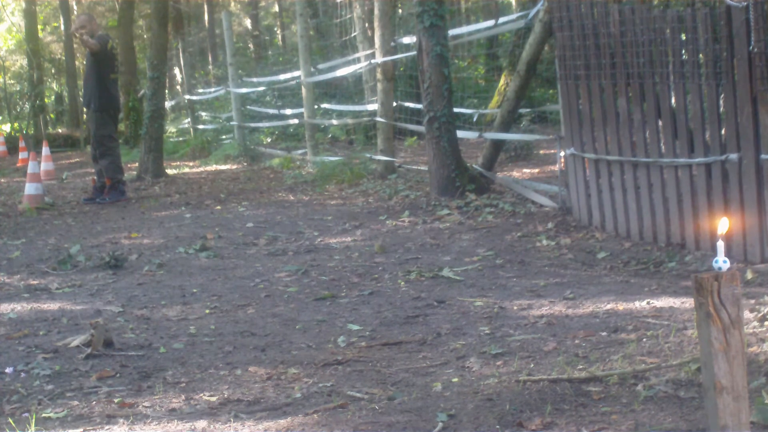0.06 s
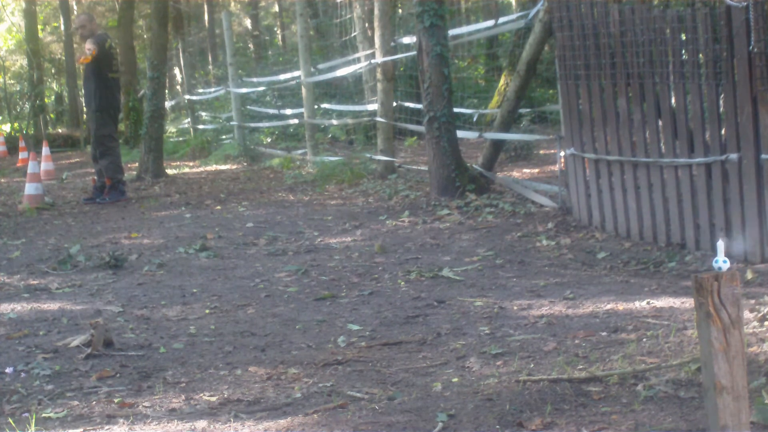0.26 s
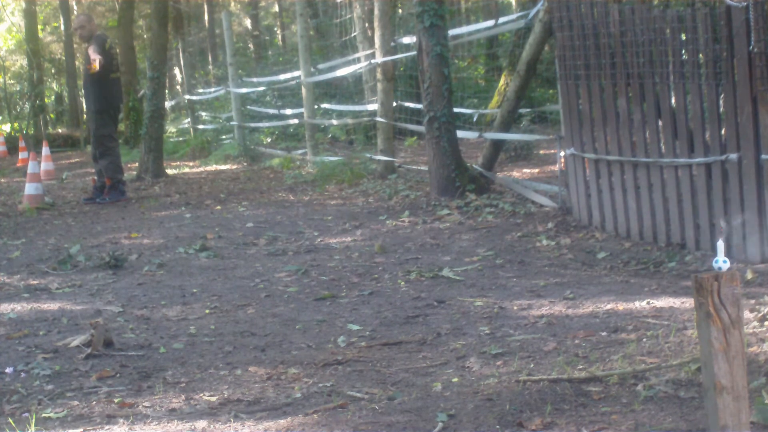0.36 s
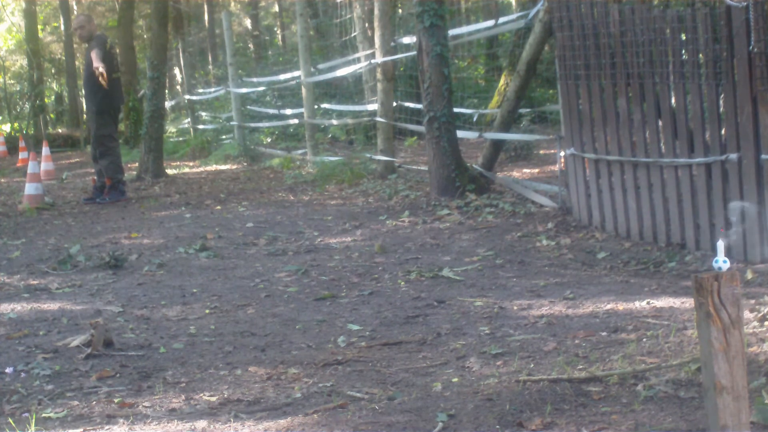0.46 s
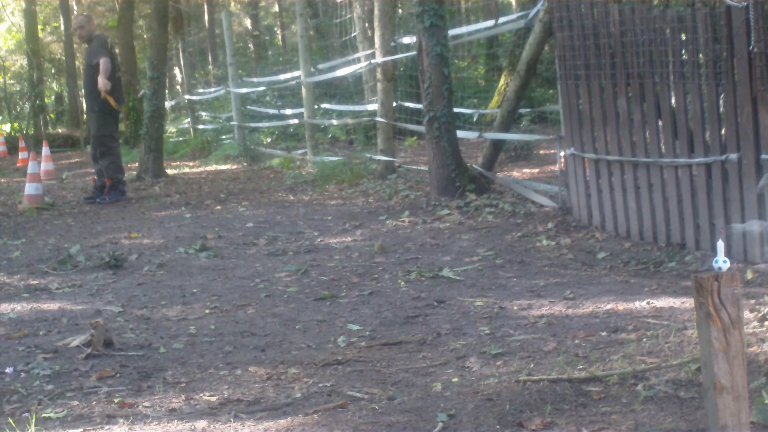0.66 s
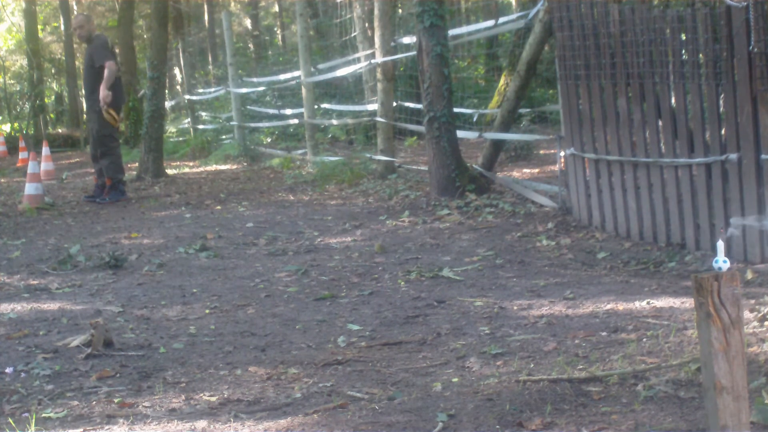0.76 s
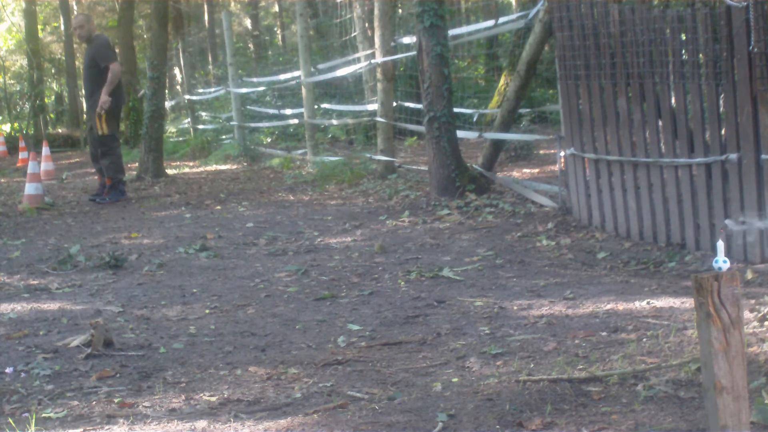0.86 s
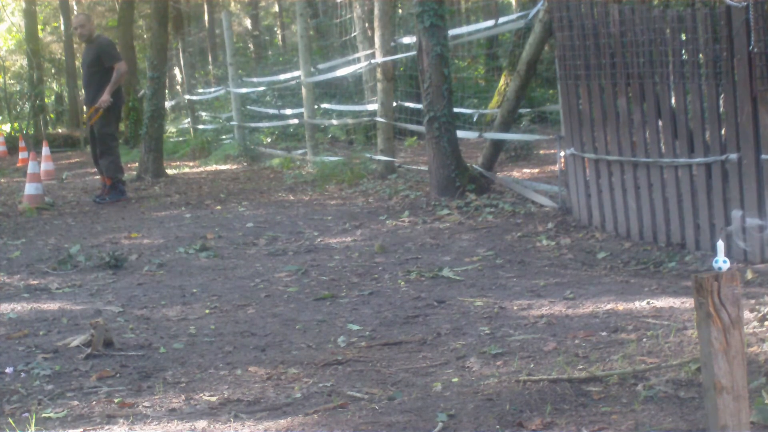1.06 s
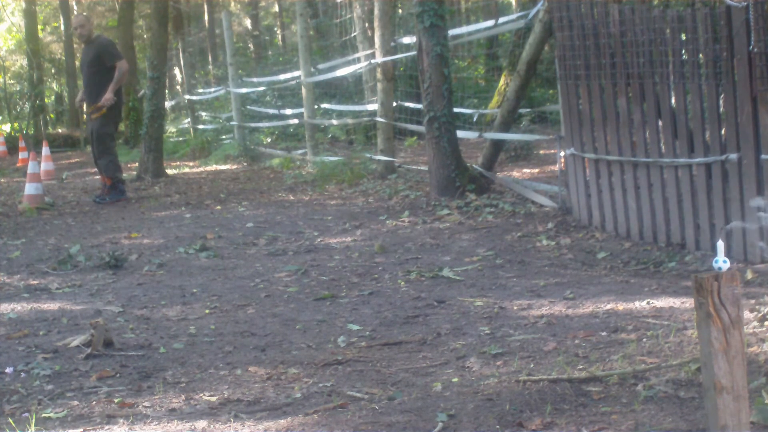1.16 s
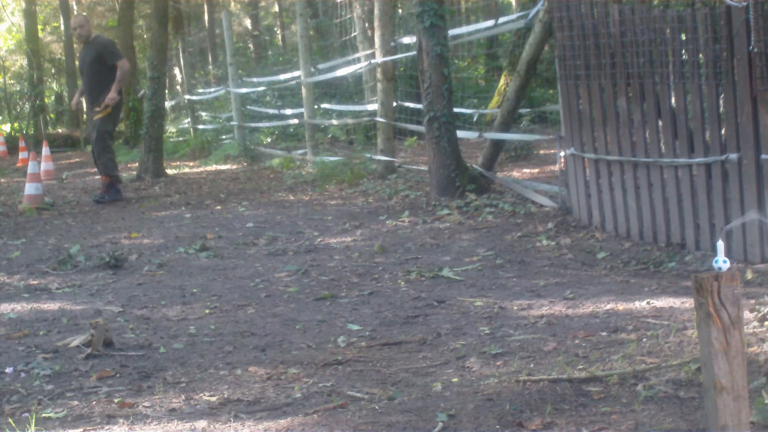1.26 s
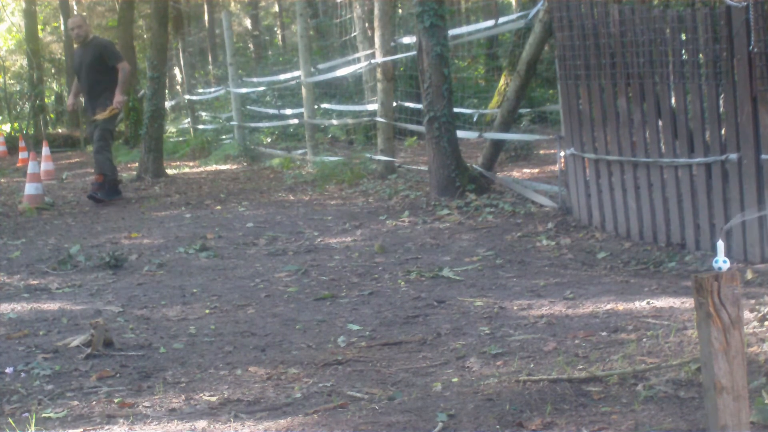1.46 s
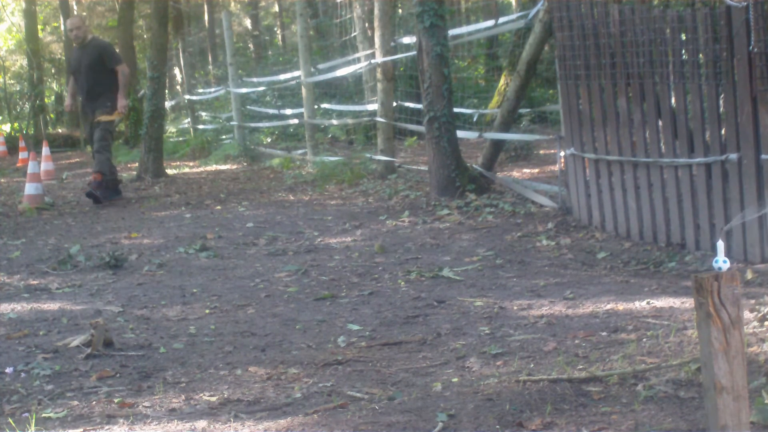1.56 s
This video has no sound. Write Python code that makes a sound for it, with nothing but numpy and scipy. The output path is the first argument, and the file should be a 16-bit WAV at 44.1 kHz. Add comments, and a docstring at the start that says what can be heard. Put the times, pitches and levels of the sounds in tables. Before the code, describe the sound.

In a quiet forest clearing, an air gun hisses and cracks very close to the microphone, its thump distorted; the tail scatters among trunks, followed by small metallic clicks, soft footsteps on litter and faint treble hiss.

```python
"""Air gun shot in a wooded clearing

Air hisses out in spurts of shaped noise, then come a sharp N-shaped snap and a noisy crack, led by a step of
pressure; its low thump overloads the microphone. Trunks scatter the shot into a short bright tail of decaying noise.
Afterwards the gun clicks as it is handled (ticks and damped modes), dry litter crackles underfoot (noise bursts),
a grainy treble hiss of random ticks fades in, and a distant bird gives one rising whistle (a gliding sine)
over quiet forest air.
"""
import sys
import numpy as np
from scipy import signal
from scipy.fft import rfft, irfft
from scipy.io import wavfile
from scipy.ndimage import uniform_filter1d

SR = 44100
rng = np.random.default_rng(int(sys.argv[2]) if len(sys.argv) > 2 else 0)


def unload_audio(sound):
    """Save the sound as a 16-bit wav file, at the path given as the first command line argument."""
    columns = np.transpose(np.atleast_2d(sound))
    # keep every value between -1 and 1, then stretch to whole-number steps
    steps = np.round(np.clip(columns, -1, 1) * 32767)
    wavfile.write(sys.argv[1], SR, steps.astype(np.int16))


N = 70560
T = np.arange(N) / SR  # time axis, s

# Every "colour" below is a noise or pulse spectrum; only its shape counts, its level is set apart.

# Colour of the quiet forest air: freq_hz, density_db (dB per Hz)
AIR_COLOUR = [(25, -14.5), (60, -4.5), (140, 0.5), (250, -2.5), (400, -8), (1000, -12), (2500, -18.5),
              (4500, -18.5), (8000, -17), (10000, -23), (15000, -25.5)]
AIR_DB = -64

# Spurts of escaping air: start_s, level_db, decay_s, throat_db (dB relative to the spurt)
AIR_SPURTS = [(0.1216, -33.5, .011, 4), (0.1548, -24, 0.0033, -14.5), (.169, -29.5, 0.0056, -21)]
# Colour of the air jet: freq_hz, density_db (dB per Hz)
JET_COLOUR = [(100, -15.5), (500, -12.5), (1100, -13), (1650, -1.5), (2200, -14), (3400, 2), (4400, -8),
              (5750, 3.5), (6500, -2.5), (7200, 0.5), (8300, -4), (10000, -5), (12000, -14), (15000, -10.5)]
# Colour of the throaty part of the jet: freq_hz, density_db (dB per Hz)
THROAT_COLOUR = [(60, -9), (150, 5), (400, -2.5), (750, -10), (1150, 4.5), (1380, -6.5), (1700, 5),
                 (2100, -11), (2700, -1), (5000, -24.5), (10000, -10.5), (15000, -30)]
JET_START_S, JET_END_S, JET_RISE_S, JET_RELEASE_S = 0.113, 0.245, 0.016, 0.012
JET_DB, JET_FLUTTER_DB = -37, 1

# Colour of the scatter from the ground, for snap and crack: freq_hz, density_db (dB per Hz)
GROUND_COLOUR = [(100, -12.5), (700, -5), (2000, 1), (4000, -7), (8000, -9), (15000, -23)]
SNAP_S, SNAP_HZ, SNAP_DB = 0.2198, 2300, -6.5
SNAP_SCATTER_DB, SNAP_SCATTER_S = -21.5, 0.0084

# Colour of the turbulent crack: freq_hz, density_db (dB per Hz)
CRACK_COLOUR = [(100, -16.5), (700, -11.5), (1400, -12.5), (1800, -1.5), (2700, 2.5), (4400, -7.5),
                (5600, -2), (6600, -10.5), (10000, -10.5), (14500, -7.5)]
# Damped modes struck by the crack: freq_hz, level_db, t60_s
CRACK_MODES = [(1870, -0.5, .004), (2700, 8, .0022), (5550, -1.5, .0045)]
CRACK_S, CRACK_HOLD_S, CRACK_DECAY_S, CRACK_DB = 0.2442, 0.0016, 0.0005, -2.5
FRONT_DB, FRONT_DECAY_S = -2.5, 0.0009  # the step of pressure that leads the crack
SPLASH_DB, SPLASH_DECAY_S = -19.5, 0.01  # scatter from the ground nearby

# Colour of the thump's pressure pulse: freq_hz, density_db (dB per Hz)
THUMP_COLOUR = [(30, -25), (65, -11.5), (100, -1.5), (165, 4.5), (230, -2.5), (350, -8), (400, -10),
                (480, -4), (760, -2.5), (1150, -6.5), (1400, -25.5), (3000, -43.5), (8000, -61)]
# Damped modes of the thump: freq_hz, level_db, t60_s
THUMP_MODES = [(113, -17.5, .04), (269.4, -13.5, 0.065), (345, -22.5, 0.079), (520, -4.5, 0.0063),
               (900, -7, 0.0027)]
THUMP_S, THUMP_DB = 0.2459, 5.5

# Colour of the echo from the trunks: freq_hz, density_db (dB per Hz)
WOOD_COLOUR = [(50, -5.5), (150, 8), (320, 13), (500, -1.5), (1200, -5), (2200, -5.5), (3400, -1),
               (4400, -8), (5200, -6), (5750, 2), (6500, -8), (10000, -12), (14000, -16.5)]
# Decay of that echo: freq_hz, t60_s
WOOD_DECAY = [(100, .5), (300, .48), (1000, 0.84), (3000, 1), (6000, 0.53), (14000, .5)]
WOOD_DB, WOOD_ONSET_S = -23.5, 0.0061
CRACK_TO_WOOD_DB, KNOCK_TO_WOOD_DB = 17, 3  # how strongly crack and knocks reach the trunks

# Knocks of the handled gun: start_s, level_db, body_db (dB relative to the tick), decay_s
GUN_KNOCKS = [(0.6867, -35, -17, 0.0011), (.6895, -30, -4.5, 0.0019), (0.7, -46.5, -5.5, 0.0037)]
# Colour of the hard tick: freq_hz, density_db (dB per Hz)
TICK_COLOUR = [(300, -34), (1300, -16), (1850, -1), (2600, 3), (3200, -10), (6000, -9), (8000, -7),
               (10000, -14), (13000, -28)]
# Colour of the low hollow body: freq_hz, density_db (dB per Hz)
BODY_COLOUR = [(60, -12), (150, -1.5), (380, -15), (520, -0.5), (750, -1.5), (1050, -9), (2000, -53),
               (8000, -26)]
# Damped modes of each knock: freq_hz, level_db (dB relative to the knock), t60_s
KNOCK_MODES = [(1850, -12, .016), (2570, -6, .02)]

# Crackles of twigs and leaves: start_s, level_db, decay_s
LITTER_CRACKLES = [(0.785, -57, 0.033), (0.869, -56.5, 0.0051), (0.9237, -50, 0.0085), (0.951, -48, 0.0025),
                   (1.0459, -54.5, 0.0055), (1.075, -56, 0.0066), (1.122, -51, 0.0015),
                   (1.2085, -44.5, 0.0084), (1.356, -48.5, 0.003), (1.507, -46, .002), (1.538, -54, .016)]
# Colour shared by the crackles and the treble grain: freq_hz, density_db (dB per Hz)
CRISP_COLOUR = [(150, 9.5), (700, -3.5), (1500, -4), (2600, 5), (4200, -3), (6000, 3), (9000, 0.5),
                (14000, -3)]
TREBLE_GRAIN_START_S, TREBLE_GRAIN_PER_S = 0.897, 290
TREBLE_GRAIN_DB, TREBLE_GRAIN_SPREAD_DB = -67.5, 12
# Colour of the dull shuffle: freq_hz, density_db (dB per Hz)
SHUFFLE_COLOUR = [(30, -4), (90, -1), (200, -4.5), (500, -23), (1500, -25.5), (6000, -23.5)]
SHUFFLE_START_S, SHUFFLE_RISE_S, SHUFFLE_DB = 1.04, 0.45, -61.5

# Colour of the footfall on soil: freq_hz, density_db (dB per Hz)
STEP_COLOUR = [(60, 3), (200, -9), (350, 7), (550, -1.5), (1200, -19), (3000, -10), (8000, -14.5)]
STEP_S, STEP_DB, STEP_DECAY_S = 1.2115, -47, 0.0095
# Crisp scuffs of dry leaves: start_s, level_db, decay_s
LEAF_SCUFFS = [(1.545, -49, 0.01), (1.5636, -37.5, 0.0011)]
# Colour of the scuffs: freq_hz, density_db (dB per Hz)
SCUFF_COLOUR = [(500, -23), (3000, -12.5), (6000, -5.5), (8500, 8), (14000, -2.5)]

BIRD_S, BIRD_RISE_S, BIRD_HOLD_S = 1.40, 0.078, 0.032
BIRD_FROM_HZ, BIRD_TO_HZ = 3300, 4950
BIRD_DB, BIRD_ECHO_DB = -62.5, 2  # echo relative to the call

RUMBLE_CUT_HZ, TOP_HZ = 50, 15200
NOTCH_HZ, NOTCH_WIDTH_HZ = 11320, 830
AGC_TOP_DB, AGC_SLOPE = -23, 0.3  # dB of ducking per dB above the top
AGC_ATTACK_S, AGC_RELEASE_S = 0.15, 0.36


def undb(db):
    """Decibels to gain."""
    return 10 ** (np.asarray(db) / 20)


def unit(x):
    """Scale to an rms of 1."""
    return x / np.sqrt(np.mean(x ** 2))


def read(points, hz):
    """Read (Hz, value) points on a log-frequency axis."""
    p = np.array(points, float)
    return np.interp(np.log(np.maximum(hz, 1)), np.log(p[:, 0]), p[:, 1])


def noise(colour):
    """Noise of the given colour, rms 1."""
    gain = undb(read(colour, np.fft.rfftfreq(N, 1 / SR)))
    return unit(irfft(rfft(rng.standard_normal(N)) * gain, N))


def drift(rate):
    """Smoothed random steps, rate of them per second, rms near 1."""
    k = int(SR / rate)
    steps = np.repeat(rng.standard_normal(N // k + 1), k)
    return unit(uniform_filter1d(steps, k)[:N])


def fade_in(start, rise):
    """Straight rise from 0 to 1."""
    return np.clip((T - start) / rise, 0, 1)


def burst(start, decay, hold=0, rise=.0001):
    """Envelope: rise, hold (counted from the start), exponential fall."""
    return fade_in(start, rise) * np.exp(-np.maximum(T - start - hold, 0) / decay)


def ring(start, modes):
    """Damped sine modes struck at one moment."""
    age = np.maximum(T - start, 0)
    return sum(undb(db) * np.sin(2 * np.pi * hz * age) * np.exp(-np.log(1000) * age / t60)
               for hz, db, t60 in modes)


def impulse(colour):
    """A single causal (minimum-phase) pressure pulse of the given colour, peak 1."""
    cepstrum = irfft(np.log(undb(read(colour, np.fft.rfftfreq(N, 1 / SR)))), N)
    # folding the cepstrum onto positive time makes the pulse causal
    cepstrum[1:N // 2] *= 2
    cepstrum[N // 2 + 1:] = 0
    pulse = irfft(np.exp(rfft(cepstrum)), N)
    return pulse / np.abs(pulse).max()


def forest_air():
    """Quiet coloured noise whose level drifts slightly."""
    return undb(AIR_DB + .7 * drift(12)) * noise(AIR_COLOUR)


def jet():
    """Air escapes in a fluttering turbulent hiss with spurts; the first spurt is throaty."""
    hiss = undb(JET_DB) * burst(JET_START_S, JET_RELEASE_S, JET_END_S - JET_START_S, JET_RISE_S)
    throat = 0
    for start, db, decay, throat_db in AIR_SPURTS:
        spurt = undb(db) * burst(start, decay, rise=.001)
        hiss = hiss + spurt
        throat = throat + spurt * undb(throat_db)
    return (hiss * noise(JET_COLOUR) + throat * noise(THROAT_COLOUR)) * undb(JET_FLUTTER_DB * drift(400))


def trunks(x):
    """Echo from many trunks: diffuse noise with its own decay in every octave, convolved with x."""
    spectrum, hz = rfft(noise(WOOD_COLOUR)), np.fft.rfftfreq(N, 1 / SR)
    centres = 2. ** np.arange(6, 15)  # octaves from 64 to 16384 Hz
    echo = 0
    for centre, pick in zip(centres, np.eye(len(centres))):
        # overlapping triangular bands that add up to the whole spectrum
        band = irfft(spectrum * read(np.c_[centres, pick], hz), N)
        echo = echo + band * np.exp(-np.log(1000) * T / read(WOOD_DECAY, centre))
    echo = echo * np.minimum(T / WOOD_ONSET_S, 1)
    return signal.fftconvolve(x, echo / np.sqrt(np.sum(echo ** 2)))[:N]


def snap():
    """One N-shaped pressure wave and its noisy scatter from the ground."""
    u = 2 * np.pi * SNAP_HZ * (T - SNAP_S)
    wave = -u * np.exp((1 - u ** 2) / 2)
    scatter = burst(SNAP_S, SNAP_SCATTER_S) * noise(GROUND_COLOUR)
    return undb(SNAP_DB) * wave + undb(SNAP_SCATTER_DB) * scatter


def blast():
    """A pressure step that rings for an instant, a turbulent crack, then a low thump that dies quickly."""
    front = undb(FRONT_DB) * burst(CRACK_S, FRONT_DECAY_S) + ring(CRACK_S, CRACK_MODES)
    crack = undb(CRACK_DB) * burst(CRACK_S, CRACK_DECAY_S, CRACK_HOLD_S) * noise(CRACK_COLOUR)
    splash = undb(SPLASH_DB) * burst(CRACK_S, SPLASH_DECAY_S) * noise(GROUND_COLOUR)
    pulse = np.interp(T - THUMP_S, T, impulse(THUMP_COLOUR), left=0)  # moved to the thump's moment
    thump = undb(THUMP_DB) * pulse + ring(THUMP_S, THUMP_MODES)
    return front + crack + splash - thump  # the thump is added upside down


def handling():
    """Dry knocks of the gun: a hard tick and a short ring over a hollow body."""
    tick, body = noise(TICK_COLOUR), noise(BODY_COLOUR)
    knocks = 0
    for start, db, body_db, decay in GUN_KNOCKS:
        strike = burst(start, decay) * (tick + undb(body_db) * body)
        knocks = knocks + undb(db) * (strike + ring(start, KNOCK_MODES))
    return knocks


def litter():
    """Envelope of twigs and leaves that crackle underfoot: sudden bursts of uneven level."""
    crackles = sum(undb(db) * burst(start, decay) for start, db, decay in LITTER_CRACKLES)
    return crackles * undb(2.0 * drift(700))


def treble_grain():
    """Envelope of a dense, grainy treble hiss that fades in: random ticks of uneven level."""
    tick_gain = undb(TREBLE_GRAIN_SPREAD_DB * np.minimum(rng.exponential(size=N), 2))
    ticks = (rng.random(N) < TREBLE_GRAIN_PER_S / SR) * tick_gain
    grain = undb(TREBLE_GRAIN_DB) * unit(signal.fftconvolve(ticks, burst(0, 0.00083))[:N])
    return grain * fade_in(TREBLE_GRAIN_START_S, 0.045)


def shuffle():
    """A dull shuffle: low noise that swells slowly."""
    return undb(SHUFFLE_DB) * fade_in(SHUFFLE_START_S, SHUFFLE_RISE_S) * noise(SHUFFLE_COLOUR)


def feet():
    """A soft footfall, then a shoe scuffs dry leaves: short bursts of coloured noise."""
    step = undb(STEP_DB) * burst(STEP_S, STEP_DECAY_S) * noise(STEP_COLOUR)
    scuffs = sum(undb(db) * burst(start, decay) for start, db, decay in LEAF_SCUFFS)
    return step + scuffs * noise(SCUFF_COLOUR)


def bird():
    """A distant whistle, a slightly wavering sine, slides up, holds, and lingers between the trees."""
    rise = fade_in(BIRD_S, BIRD_RISE_S)
    glide_hz = BIRD_FROM_HZ + (BIRD_TO_HZ - BIRD_FROM_HZ) * rise ** 1.2
    pitch_hz = glide_hz * (1 + 0.011 * drift(500))
    tone = np.sqrt(2) * np.sin(2 * np.pi * np.cumsum(pitch_hz) / SR)  # rms 1
    call = undb(BIRD_DB) * tone * burst(BIRD_S, 0.017, BIRD_RISE_S + BIRD_HOLD_S, 0.022)
    return call + undb(BIRD_ECHO_DB) * trunks(call)


def scene():
    """The shot and its echo, the small sounds after it, and the forest air."""
    gun, knocks = jet() + snap(), handling()
    # among the trees the crack is one clean pulse
    far_crack = undb(CRACK_TO_WOOD_DB) * (np.arange(N) == int(CRACK_S * SR))
    echo = undb(WOOD_DB) * trunks(gun + far_crack + undb(KNOCK_TO_WOOD_DB) * knocks)
    shot = gun + blast() + knocks + echo
    # crackles and treble grain shape one and the same noise
    crisp_level = litter() + treble_grain()
    dull = shuffle()
    crisp = crisp_level * noise(CRISP_COLOUR)
    return (shot + (crisp + dull) + feet() + bird() + forest_air())[None]


def record(dry):
    """The microphone cuts rumble, overloads and has a treble notch; gain control ducks, then recovers slowly."""
    rumble_cut = signal.butter(2, RUMBLE_CUT_HZ, "high", fs=SR, output="sos")
    x = np.tanh(signal.sosfilt(rumble_cut, dry[0]))  # soft overload
    # peak follower: jumps up at once, falls exponentially
    fall = T / AGC_RELEASE_S
    peak = np.exp(np.maximum.accumulate(np.log(np.abs(x) + 1e-9) + fall) - fall)
    duck_db = AGC_SLOPE * np.maximum(20 * np.log10(peak) - AGC_TOP_DB, 0)
    k = np.exp(-1 / (AGC_ATTACK_S * SR))
    x = x * undb(-signal.lfilter([1 - k], [1, -k], duck_db))
    b, a = signal.iirnotch(NOTCH_HZ, NOTCH_HZ / NOTCH_WIDTH_HZ, SR)
    notched = signal.lfilter(b, a, signal.lfilter(b, a, x))
    x = notched * 1.012 + x * 0.12  # some sound passes beside the notch
    return signal.sosfilt(signal.ellip(8, .2, 60, TOP_HZ, fs=SR, output="sos"), x)[None]  # treble limit


dry = scene()
out = record(dry)
unload_audio(out)
```